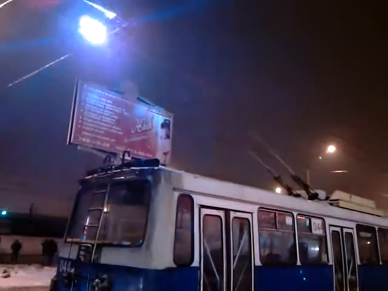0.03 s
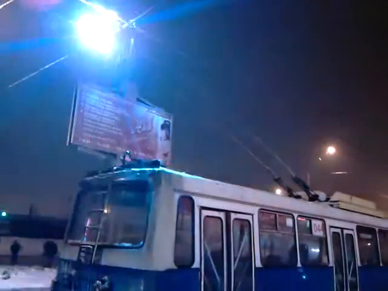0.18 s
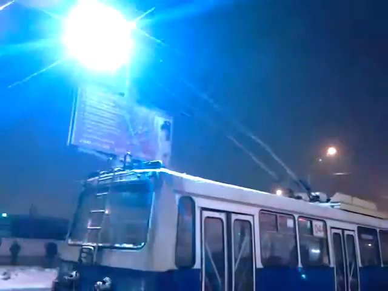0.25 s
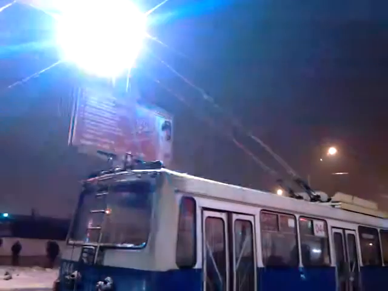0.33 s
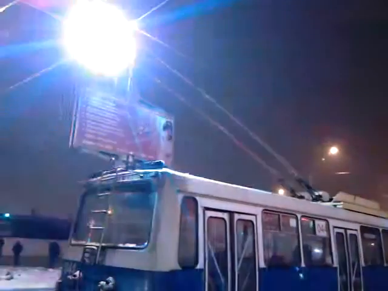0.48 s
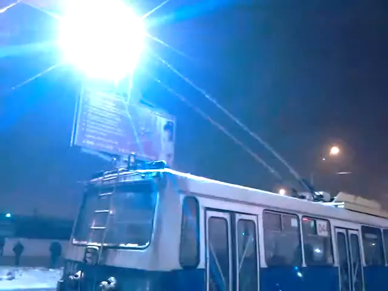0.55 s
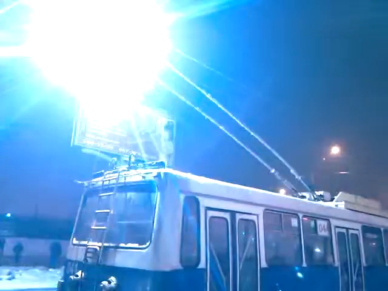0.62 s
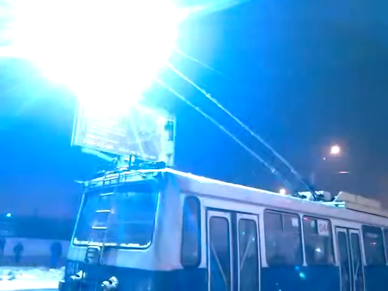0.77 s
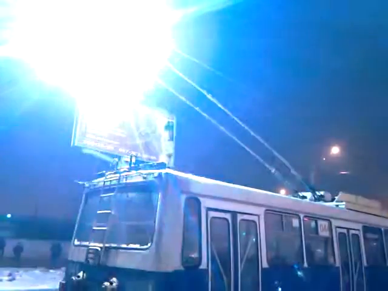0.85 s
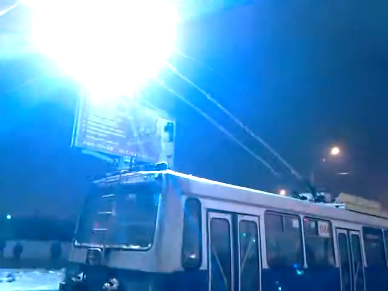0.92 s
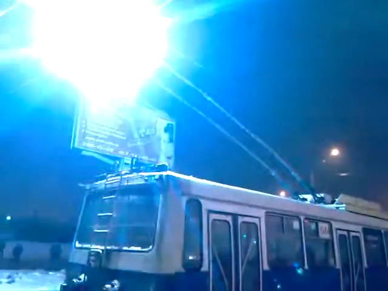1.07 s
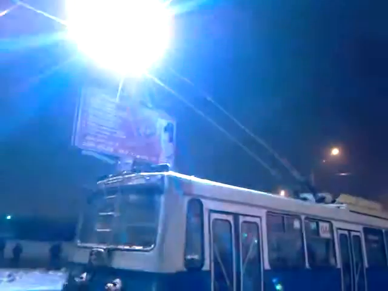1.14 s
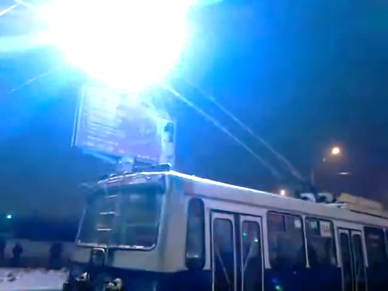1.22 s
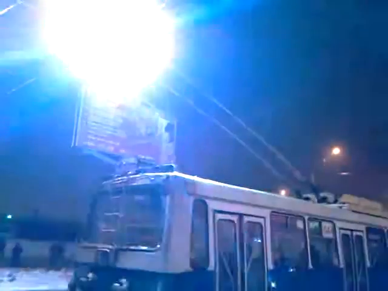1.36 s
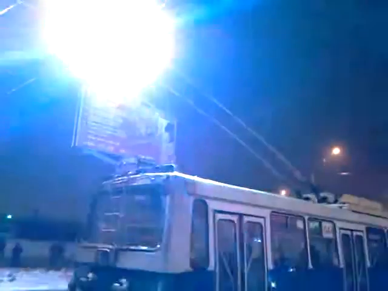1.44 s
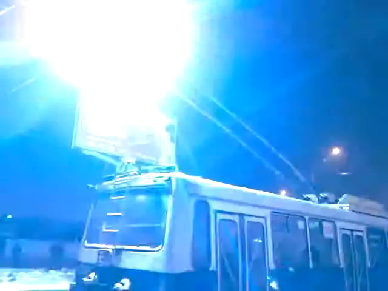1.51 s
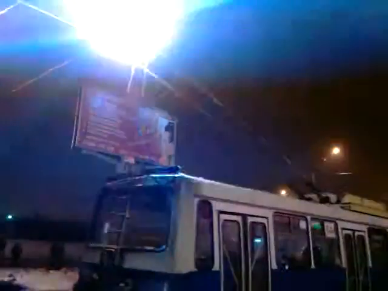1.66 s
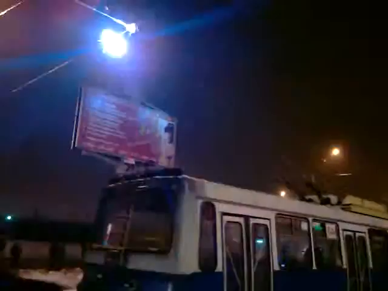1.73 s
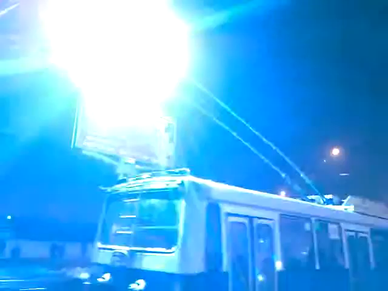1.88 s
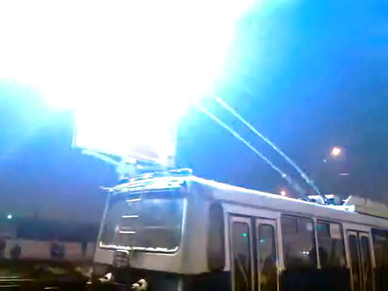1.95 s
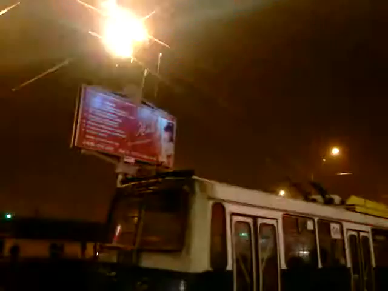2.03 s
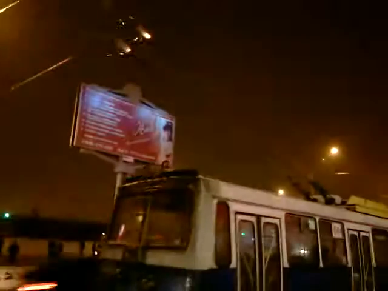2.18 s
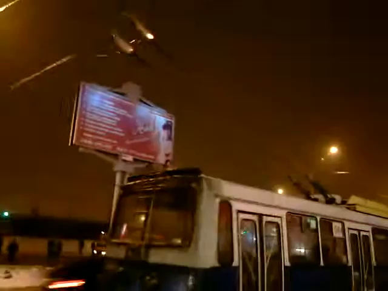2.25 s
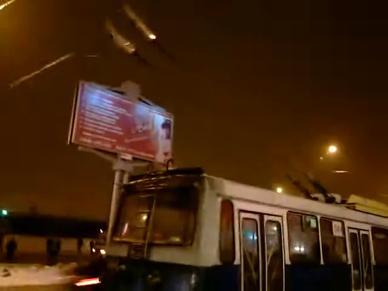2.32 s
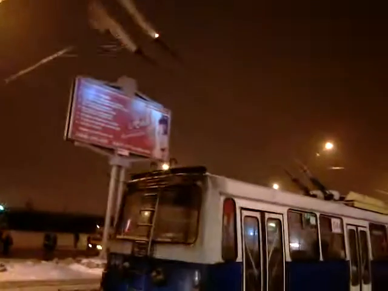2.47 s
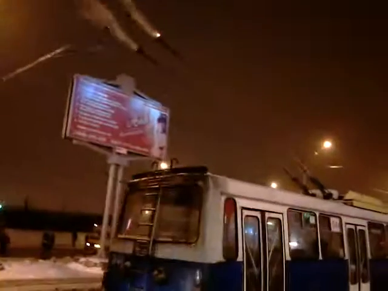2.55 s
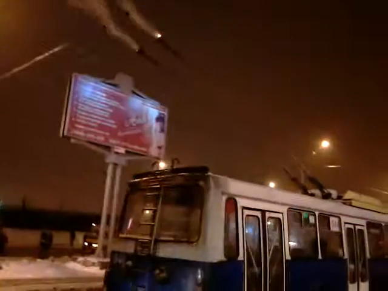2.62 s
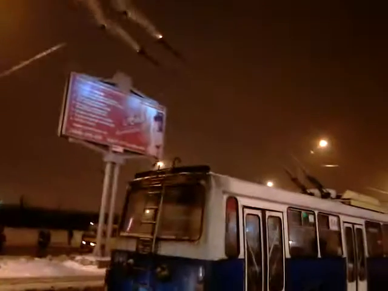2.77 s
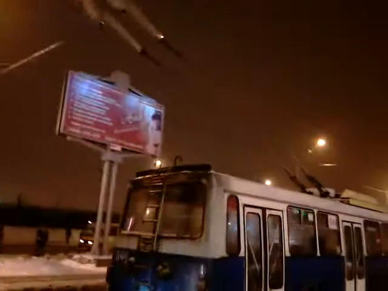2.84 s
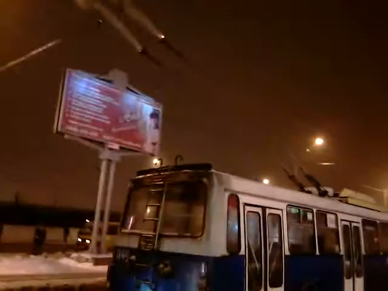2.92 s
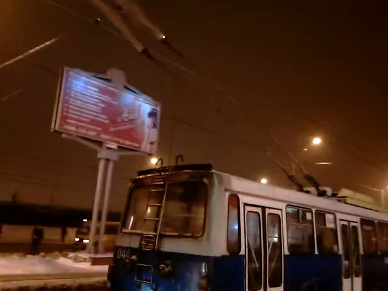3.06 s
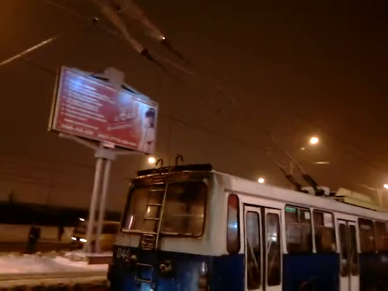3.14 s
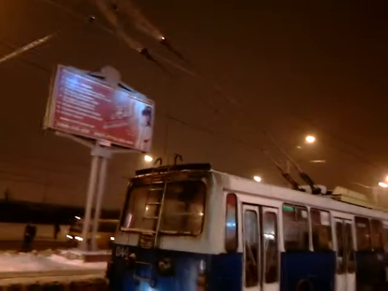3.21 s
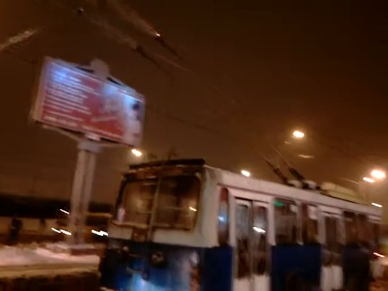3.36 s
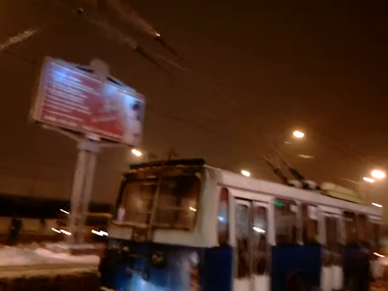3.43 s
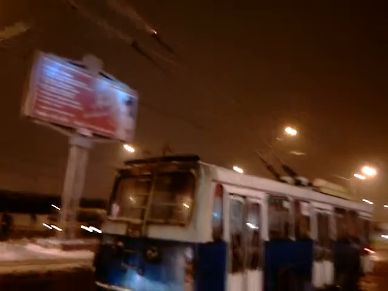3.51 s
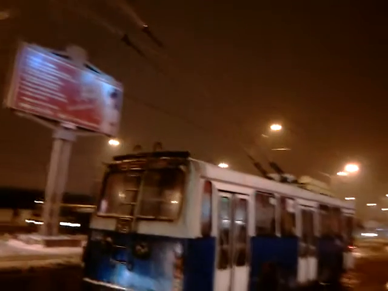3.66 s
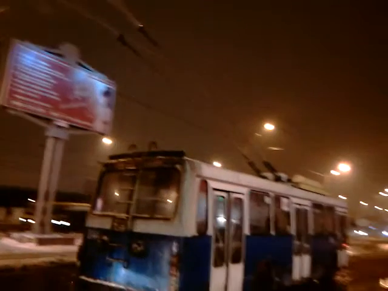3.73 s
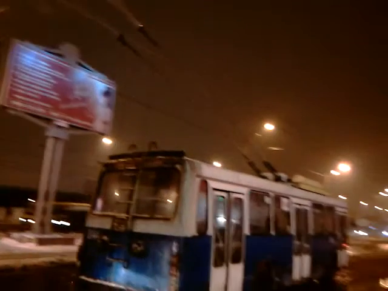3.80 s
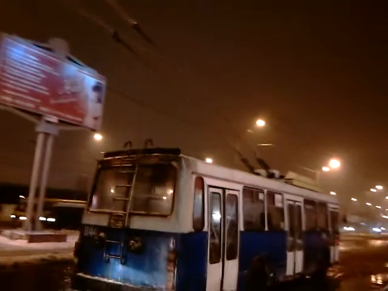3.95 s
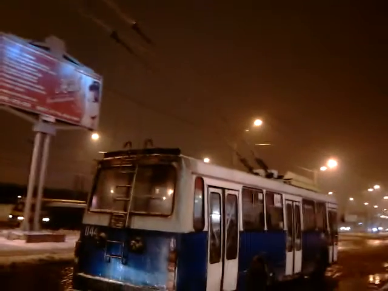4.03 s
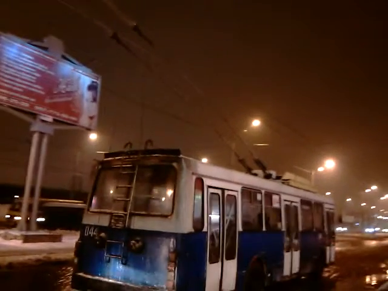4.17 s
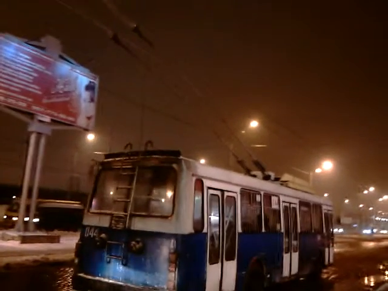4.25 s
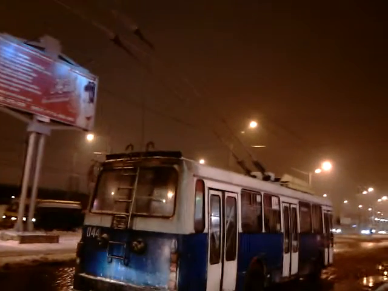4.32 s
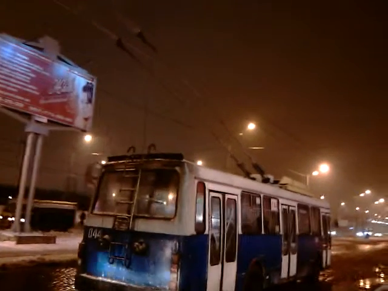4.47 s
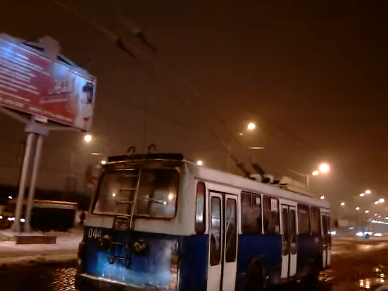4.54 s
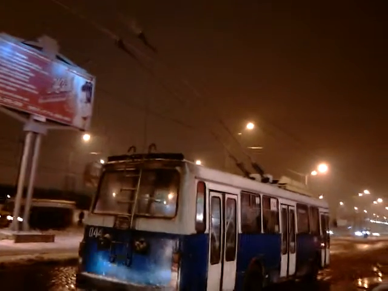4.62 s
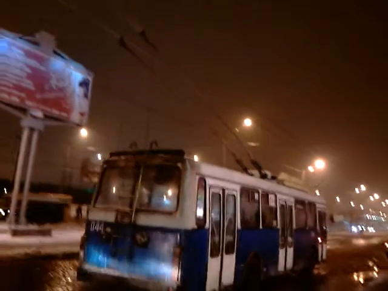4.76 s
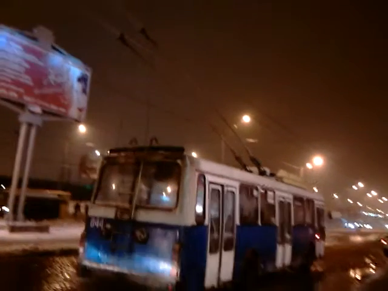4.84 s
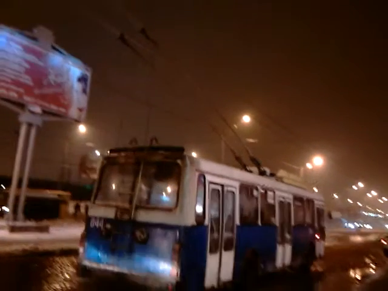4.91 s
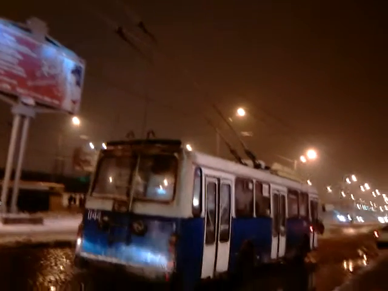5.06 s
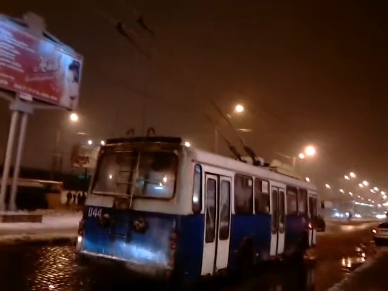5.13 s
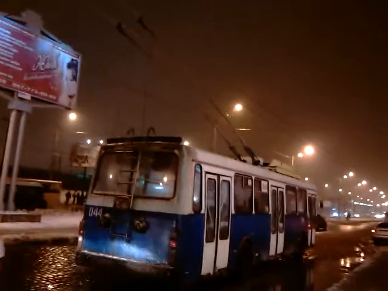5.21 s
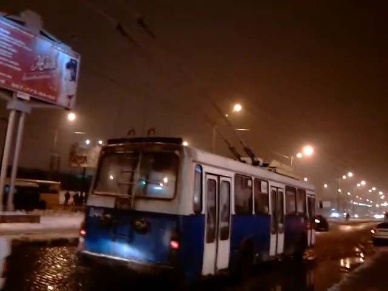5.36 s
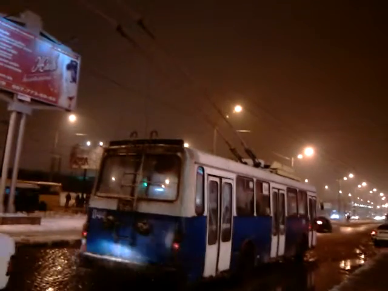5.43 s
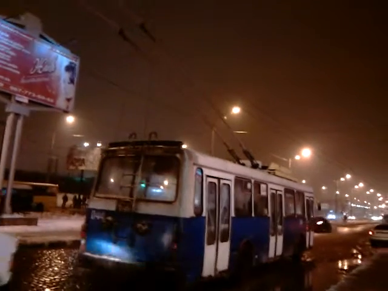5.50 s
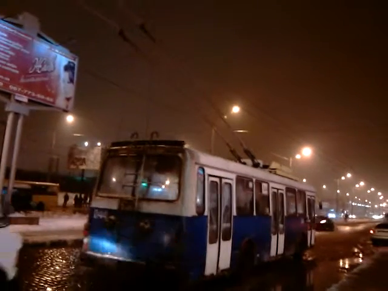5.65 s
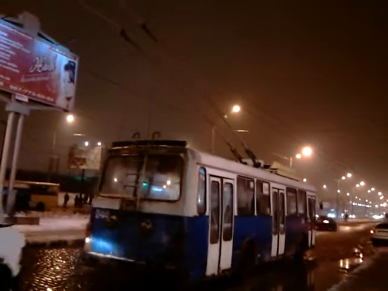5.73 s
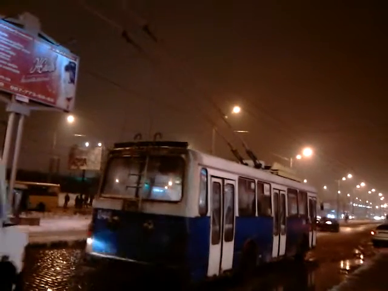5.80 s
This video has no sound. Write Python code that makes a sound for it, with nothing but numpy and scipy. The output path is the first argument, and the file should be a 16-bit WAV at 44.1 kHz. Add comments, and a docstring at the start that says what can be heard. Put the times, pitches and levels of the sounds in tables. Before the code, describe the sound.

Violent spitting electrical sparks on a wet winter street cut off abruptly, followed by a hard clack, revving diesel, tyre hiss and gusts.

```python
"""An electric arc spits and flares at a trolleybus pole under an iced wire and goes out after two seconds.
It is a train of pressure spikes, filtered into snap and roar, with a ground reflection and a street echo.
A traction motor and a distant car hum as gliding sines; a diesel sums exhaust harmonics and pulsed clatter.
Filtered noise makes wet tyres, spray, squeaks, a slam and its rebound, and gusts on the microphone;
that small microphone passes a narrow speech band and overloads on the highest peaks."""
import sys
import numpy as np
from scipy import signal
from scipy.fft import rfft, irfft, next_fast_len
from scipy.io import wavfile
from scipy.ndimage import uniform_filter1d, map_coordinates

SR = 44100
rng = np.random.default_rng(int(sys.argv[2]) if len(sys.argv) > 2 else 0)


def wav_record(signal):
    """Record a signal, one row per channel, as 16-bit PCM in the file named by sys.argv[1]."""
    frames = np.transpose(np.atleast_2d(signal))
    bounded = np.clip(frames, -1, 1)
    # unit amplitude maps onto the largest positive 16-bit level
    quanta = np.round(bounded * 32767).astype(np.int16)
    wavfile.write(sys.argv[1], SR, quanta)


N = 259484


def amp(db):
    """Decibel law: amplitude ratio of a level."""
    return 10 ** (np.asarray(db) / 20)


def unit(x):
    """Power normalisation: scale to rms 1."""
    return x / np.sqrt(np.mean(x ** 2) + 1e-20)


def clock():
    """Uniform sampling: the time of each sample in seconds."""
    return np.arange(N) / SR


def along(points, hz):
    """Logarithmic frequency scale: interpolate (f/Hz, value) points along it."""
    f, v = np.transpose(points)
    return np.interp(np.log(hz + 1), np.log(f + 1), v)


def curves(rows):
    """Linear interpolation: one value per sample for each column after the time."""
    s, *cols = np.transpose(rows)
    return [np.interp(clock(), s, c) for c in cols]


def wobble(rate):
    """Band-limited fluctuation: a smooth random curve with rate knots a second."""
    knots = rng.standard_normal(int(N * rate / SR) + 4)
    return map_coordinates(knots, [clock() * rate])


def filtered(x, response):
    """Linear filtering: multiply the spectrum by a response of frequency."""
    size = next_fast_len(N + SR // 2)
    return irfft(rfft(x, size) * response(np.fft.rfftfreq(size, 1 / SR)), size)[:N]


def noise(spectrum):
    """Spectral shaping: Gaussian noise of rms 1 with the given colour."""
    return unit(filtered(rng.standard_normal(N), lambda hz: amp(along(spectrum, hz))))


def narrow(centre_hz, width_hz):
    """Resonance: noise of rms 1 in one peak, width_hz wide at half amplitude."""
    white = rng.standard_normal(N)
    return unit(filtered(white, lambda hz: 1 / (1 + (2 * (hz - centre_hz) / width_hz) ** 2)))


def voice_band(x, edge_hz=3690):
    """Band limitation: the microphone channel falls steeply above the speech band."""
    return filtered(x, lambda hz: 1 / np.sqrt(1 + (hz / edge_hz) ** 64))


def struck(pulses, colour, size=2048):
    """Minimum-phase impulse response: colour pulses causally, with unit gain in power in the speech band."""
    cepstrum = irfft(np.log(amp(along(colour, np.fft.rfftfreq(size, 1 / SR)))))
    # folding the cepstrum onto positive times makes the filter causal
    cepstrum[1:size // 2] *= 2
    cepstrum[size // 2 + 1:] = 0
    shape = irfft(np.exp(rfft(cepstrum)))
    audible = voice_band(np.pad(shape, (size, 0)))
    return signal.fftconvolve(pulses, shape / np.linalg.norm(audible))[:N]


def burst(start, length, rise_s, fall_s):
    """Exponential relaxation: an envelope that rises, holds for its length and falls."""
    age = np.maximum(clock() - start, 0)
    fall = np.exp(-np.minimum(np.maximum(age - length, 0) / fall_s, 60))
    return (1 - np.exp(-age / rise_s)) * fall


def hum(hz, db, waver_db):
    """Phase integration: one gliding low tone."""
    tone = np.sqrt(2) * np.sin(2 * np.pi * np.cumsum(hz) / SR)
    return amp(db + waver_db * wobble(4.7)) * tone


def street_echo(x, build_s=0.0098):
    """Diffuse reverberation: a tail off the house fronts, each frequency dying at its own speed."""
    # decay of the street: f/Hz, t60/s
    houses = [(150, 0.74), (1000, 0.88), (3500, 0.74)]
    hz, t, z = signal.stft(rng.standard_normal(SR), SR, nperseg=256)
    decay = amp(-60 * t / along(houses, hz)[:, None])
    tail = signal.istft(z * decay * (1 - np.exp(-t / build_s)), SR, nperseg=256)[1]
    return signal.fftconvolve(x, tail / np.linalg.norm(tail))[:N]


def traffic(near_db=-25, swell_db=1.5):
    """Broadband rolling noise: wet tyres hiss above a rumble, and narrow tones rise with nearness."""
    # hiss of the wet street: t/s, level/dB
    street = [(0, -32.5), (1.7, -26.5), (2.4, -30.5), (3.3, -32.5), (3.65, -24), (4.9, -25.5), (5.35, -28),
              (5.88, -28.5)]
    # relative spectrum of the tyre hiss: f/Hz, level/dB
    tyres = [(260, -34.5), (450, -11), (544, -14), (767, -5), (878, -7.5), (1110, -3), (1200, -10.5),
             (1340, -6), (1610, -7.5), (1780, -8), (3280, -13), (3660, -16.5), (3900, -14.5), (5070, -60.5),
             (8580, -120)]
    # relative spectrum of the rumble: f/Hz, level/dB
    rumble_colour = [(15, -14.5), (35, -1), (90, 3.5), (160, 1.5), (280, 0), (450, -5.5), (650, -12),
                     (1200, -25.5)]
    # tones of passing traffic when the hiss is at near_db: f/Hz, width/Hz, level/dB
    whine = [(1220, 76, -37), (1330, 63, -35.5), (3398, 200, -43)]
    rumble_db, rumble_follows = -28.5, 0.44  # level at near_db; share of the hiss swings it follows
    hiss_db, = curves(street)
    nearness = amp(hiss_db - near_db)
    tones = sum(amp(db + swell_db * np.tanh(wobble(3.7))) * narrow(hz, width) for hz, width, db in whine)
    hiss = amp(hiss_db + 1.1 * wobble(18)) * noise(tyres)
    rumble = amp(rumble_db + 1.9 * wobble(8.2)) * noise(rumble_colour)
    return nearness ** rumble_follows * rumble + hiss + nearness ** 2 * tones


def distant_car():
    """Periodic radiation: a car further off is heard as one gliding, wavering hum."""
    # hum of the car: t/s, f/Hz, level/dB
    car = [(1.9, 48, -46.5), (2.35, 56.64, -33.5), (3.0, 52.7, -36), (3.6, 47.1, -53)]
    hz, db = curves(car)
    return hum(hz, db, waver_db=1.3)


def spray(width_hz=650):
    """Spreading and frequency shift: a passing car's band of hiss swells, fades and sinks in pitch."""
    peak_db, peak_s, approach_s = -28, 5.15, 1.34  # loudest moment and time scale of the swell
    from_hz, to_hz, turn_s, glide_s = 2130, 1352, 4.95, .3
    t = clock()
    hz = from_hz + (to_hz - from_hz) * (1 + np.tanh((t - turn_s) / glide_s)) / 2
    nearness = 1 / (1 + ((t - peak_s) / approach_s) ** 2) ** 2
    drift = np.exp(2j * np.pi * np.cumsum(hz - hz.mean()) / SR)
    band = (signal.hilbert(narrow(hz.mean(), width_hz)) * drift).real
    return nearness * amp(peak_db + wobble(15)) * band


def wind(lumpy_db=6.5):
    """Turbulent pressure: lumpy gusts on the microphone, the strongest eddies single push-pull swings."""
    # gusts: t/s, length/s, level/dB
    gusts = [(0, 0.04, -15.5), (0.101, 0.11, -17.5), (0.513, 0.13, -20.5), (1.714, 0.079, -21.5),
             (2.438, 0.2, -31), (3.592, 0.43, -18), (4.076, 0.075, -23.5), (4.25, .5, -30.5),
             (5.434, 0.043, -17.5), (5.606, 0.081, -23.5), (5.753, 0.1, -23.5)]
    # relative spectrum of the buffeting: f/Hz, level/dB
    buffet = [(18, -45.5), (30, -7), (113, -3), (233, -1.5), (268, 0.5), (332, -2.5), (411, -6), (649, -11),
              (900, -17.5), (1170, -52), (1980, -120)]
    # single eddies that hit the microphone: t/s, peak level/dB, f/Hz
    puffs = [(.124, -9, 335), (.141, -4, 380), (0.534, -5, 250), (0.551, -2.5, 306), (1.797, -9, 398),
             (3.615, -6.5, 293.5), (3.697, 7, 269), (3.771, 0, 330), (3.79, 0, 204), (3.85, 1.5, 307),
             (3.891, -8, 400), (3.947, -1, 396), (3.957, 5, 254), (4.15, -10, 400), (5.446, -11, 220)]
    rise_s, fall_s, breeze_db = 0.016, 0.039, -48.5
    t = clock()
    force = amp(breeze_db) + sum(amp(db) * burst(s, length, rise_s, fall_s) for s, length, db in gusts)
    out = force * unit(amp(lumpy_db * np.tanh(wobble(160))) * noise(buffet))
    for s, db, hz in puffs:
        u = 2 * np.pi * hz * (t - s)
        out -= amp(db) * u * np.exp((1 - u * u) / 2)
    return out


def diesel(knock_decay=0.37, uneven_db=-2.5, load_db=11):
    """Harmonic series and pulsed noise: each firing puffs the exhaust and rattles the block."""
    # speed of the engine: t/s, firing rate/Hz
    engine = [(0, 26.3), (1.0, 29), (2.0, 27.7), (3.22, 27.8), (3.5, 33.5), (3.8, 40.5), (4.5, 39),
              (4.95, 40.8), (5.3, 39.7), (5.6, 32.5)]
    # relative exhaust harmonics: multiple of the firing rate, level/dB
    harmonics = [(1, -0.5), (1.5, -17.5), (2, -11), (3, -7), (4, -6), (5.5, -8), (7, -15.5)]
    block_colour = [(200, -18.0), (600, -10.0), (1150, 5), (1800, 0.5), (2500, -7), (3500, -11)]  # f/Hz, dB
    exhaust_db, idle_clatter_db, revved_clatter_db = -34, -40.5, -23.5
    idle_rate, revved_rate = 26, 33.25  # firings a second between which the clatter comes up
    rate, = curves(engine)
    clatter_db = np.interp(rate, [idle_rate, revved_rate], [idle_clatter_db, revved_clatter_db])
    firings = np.cumsum(rate) / SR
    phase = 2 * np.pi * firings
    load = amp(load_db * (rate - rate.max()) / np.ptp(rate))  # speed brings out the overtones
    exhaust = np.zeros(N)
    for k, db in harmonics:
        level = amp(db + 2.8 * wobble(6)) * (load if k > 1 else 1)
        exhaust += level * np.sin(k * phase + .5 * wobble(7.8))
    age = firings % 1  # share of a cycle since the last firing
    knock = np.exp(-age / knock_decay) * (1 - np.exp(-age / 0.15))
    beats = knock * amp(uneven_db * np.cos(phase / 4))  # four unlike cylinders
    clatter = unit(beats * noise(block_colour))
    return amp(exhaust_db) * np.sqrt(2) * exhaust + amp(clatter_db) * clatter


def motor():
    """Exponential approach to a top speed: the traction motor spins up and hums while it pulls."""
    start_hz, top_hz, spin_up_s = 154.5, 172.5, .72
    pull_db, on_s, off_s, fade_db_per_s = -34.5, .35, 1.05, 52
    t = clock()
    hz = top_hz + (start_hz - top_hz) * np.exp(-t / spin_up_s)
    outside_s = np.abs(t - np.clip(t, on_s, off_s))  # time away from the steady pull
    return hum(hz, pull_db - fade_db_per_s * outside_s, waver_db=0.0)


def slam(clack_t60=0.12, attack=0.0029, lumpy_db=-1.0):
    """Impact and damped modes: two blows on a vehicle body clack, then its panels boom and rattle."""
    # a slam and its rebound: t/s, clack level/dB, boom level/dB, boom t60/s
    blows = [(2.914, -9.5, -15.5, 0.14), (2.951, -13, -16.5, 0.35)]
    # relative spectrum of the hard clack: f/Hz, level/dB
    clack_colour = [(290, -27.5), (500, -7), (736, -16), (1100, -4.5), (1240, -8), (2010, -19), (2170, -19),
                    (3230, -17), (3490, -15), (3900, -20.5), (5070, -50.5), (8580, -120)]
    # relative spectrum of the panel boom: f/Hz, level/dB
    boom_colour = [(12, -31), (20, 1), (40, -10.5), (166, -13.5), (218, -8), (484, -15), (549, -14),
                   (743, -16.5), (858, -47.5), (900, -22), (1170, -48.5), (1980, -120)]
    clack, out = noise(clack_colour), np.zeros(N)
    boom = unit(noise(boom_colour) * amp(lumpy_db * wobble(90)))
    for s, clack_db, boom_db, t60 in blows:
        age = np.maximum(clock() - s, 0)
        hard = amp(clack_db - 60 * age / clack_t60) * clack
        deep = amp(boom_db - 60 * age / t60) * boom
        out += (1 - np.exp(-age / attack)) * (hard + deep)
    # a low panel mode rings on after the rebound
    age = np.maximum(clock() - blows[-1][0], 0)
    out += amp(-20.5 - 60 * age / 0.28) * (1 - np.exp(-age / attack)) * narrow(255, 50)
    return out + amp(-7.0) * street_echo(out)


def squeaks(width_hz=290, steadiness=0.64):
    """Noise-driven resonance: each squeak or zip is one shrill, wavering peak over a broad scrape."""
    # squeaks: t/s, Gaussian half length/s, tone level/dB, f/Hz, scrape relative to the tone/dB
    squeak_rows = [(0.134, 0.0062, -19.5, 3570, -9), (0.185, 0.0069, -14, 3520, -23),
                   (0.207, 0.036, -28, 3770, -29), (0.267, 0.0048, -26.5, 3580, -20),
                   (0.345, 0.0087, -16, 2510, -2.5), (0.68, 0.0046, -11, 3305, -7.5),
                   (1.507, 0.0049, -8, 3390, -12), (5.501, .001, -16.5, 3312, 4),
                   (5.503, 0.015, -27, 3413, 1), (5.523, 0.0076, -17, 3390, -28),
                   (5.566, .055, -31, 3470, -7)]
    scrape = unit(voice_band(noise([(500, -9.0), (1500, -3), (3500, -3.5)])))  # f/Hz, dB
    out = np.zeros(N)
    for s, half, db, hz, scrape_db in squeak_rows:
        tone = narrow(hz, width_hz)
        swing = np.sqrt(np.abs(uniform_filter1d(tone ** 2, size=40)) + 1e-6)
        steadied = unit(tone / swing ** steadiness)
        envelope = np.exp(-((clock() - s) / half) ** 2 / 2)
        out += amp(db) * envelope * (steadied + amp(scrape_db) * scrape)
    return out


def sparks(rate, scatter, spread_db):
    """Random point process: irregular spikes of one sign and mean power 1, rate a second."""
    count = np.cumsum(rate) / SR
    chance = rng.standard_normal((8000, 2))[:int(count[-1])]
    due = np.arange(len(chance)) + scatter * chance[:, 0]
    at = np.searchsorted(count, due).clip(0, N - 1)
    size = unit(amp(spread_db * np.tanh(chance[:, 1])))
    return -np.bincount(at, size * np.sqrt(SR / rate[at]), N)


def ground_echo(x, delay=.0066, gain=0.75, wander=0.00031):
    """Specular reflection: the road returns every spark after a delay that shifts as the flame dances."""
    late = np.arange(N) - SR * (delay + wander * wobble(7))
    return (x + gain * map_coordinates(x, [late], order=1)) / np.hypot(1, gain)


def arc_strength(sputter_flame_db=-6, ignite_s=.002):
    """Ignition, stretching and quenching: strength of sparks and flame, flares over a growing sputter."""
    # flares, before sag and strike: t/s, length/s, relative level/dB, flame roar relative to the snap/dB
    flares = [(0.314, 0.044, -20.5, -4.5), (0.386, 0.028, -28, 4.5), (0.478, .1, -24, 0.5),
              (0.647, .135, -16.5, -1.5), (0.84, 0.013, -23, -7), (0.892, .016, -21.5, -3.5),
              (0.924, 0.036, -21.5, -11), (0.958, .205, -15, 0), (1.203, .011, -18, 4),
              (1.243, 0.073, -19.5, 5.5), (1.357, 0.017, -20, -9), (1.402, 0.039, -21, -4),
              (1.463, 0.049, -13, 0.5), (1.52, .04, -17.5, -1.5), (1.565, .058, -13, 4),
              (1.656, .024, -21, 6.5), (1.729, .028, -19.5, -5), (1.896, .05, -9, 2),
              (1.967, .04, -13.5, 1.5)]
    strike_db, strike_s = 2.5, .015  # a flare strikes with extra snap, which fades this fast
    sag_db_per_s = 22  # it weakens as the arc stretches
    flame_grows_s, quench_s = 0.0057, .004  # the flame builds up, and dies when the arc breaks
    # faint sputter builds up as the pole drags through the ice
    start_db, grows_db_per_s, top_db = -38, 9, -28.5
    out_s, fade_db_per_s = 2.08, 230  # the pole finds clean wire
    t = clock()
    sputter_db = np.minimum(start_db + grows_db_per_s * t, top_db)
    strength = amp(sputter_db - fade_db_per_s * np.clip(t - out_s, 0, 1))
    flame = strength * amp(sputter_flame_db)
    for start, length, db, roar_db in flares:
        age = np.clip(t - start, 0, length)
        level_db = db - sag_db_per_s * age
        snap = amp(level_db + strike_db * np.exp(-age / strike_s)) * burst(start, length, ignite_s, quench_s)
        strength = np.maximum(strength, snap)
        roar = amp(level_db + roar_db) * burst(start, length, flame_grows_s, quench_s)
        flame = np.maximum(flame, roar)
    return strength, flame


def arc(sparse_rate=150, dense_rate=600, snap_db=1.0, roar_db=-1, single_db=6, wet_db=-14.0, flicker_db=3.0):
    """Impulsive discharge: a stronger arc sparks faster, and a long flame adds a lower roar to each spark."""
    # single loud sparks, before single_db and the filters: t/s, relative level/dB
    snaps = [(0.65, -5.5), (0.68, 0.5), (1.0276, 2), (1.068, 1), (1.157, -7.5), (1.2042, 1), (1.21, -5),
             (1.371, -3), (1.538, 0.5), (1.674, 3.5), (1.736, 1.5), (1.748, 4), (1.797, -1), (1.818, -3),
             (1.8386, -1.5), (1.858, -3), (1.8987, -3.5), (1.987, -4)]
    # relative spectrum of the snap: f/Hz, level/dB
    snap_colour = [(100, -23), (600, -16), (1300, -2), (2150, 1.5), (2550, 6), (2850, 0.5), (3300, 7.5),
                   (3700, 0.5)]
    # relative spectrum of the flame's roar: f/Hz, level/dB
    roar_colour = [(100, -33.5), (480, -5.5), (770, 3), (1000, -2), (1300, 2), (1550, -7), (1820, -1),
                   (2150, -4.5), (3500, -20.5)]
    strength, flame = arc_strength()
    rate = sparse_rate + dense_rate * np.minimum((strength / amp(-16)) ** 1.4, 3)
    train = sparks(rate, scatter=.45, spread_db=2.0)
    train *= unit(amp(flicker_db * np.tanh(wobble(90))))  # the current comes in spurts
    singles = np.zeros(N)
    for s, db in snaps:
        singles[round(s * SR)] = -amp(db + single_db)
    crackle = amp(snap_db) * struck(train * strength + singles, snap_colour)
    roar = amp(roar_db) * struck(train * flame + singles / 2, roar_colour)
    direct = ground_echo(crackle + roar)
    return direct + amp(wet_db) * street_echo(direct)


def scene():
    """Superposition: the arc and the street around it, all in one channel."""
    vehicles = motor() + distant_car() + diesel() + traffic() + spray()
    return (arc() + vehicles + wind() + slam() + squeaks())[None]


def record(dry, ceiling=.72, hardness=14, top_hz=15870):
    """Band limitation and saturation: a narrow speech band, then overload on the highest peaks."""
    x = voice_band(dry[0])
    x = x / (1 + np.abs(x / ceiling) ** hardness) ** (1 / hardness)
    return filtered(x, lambda hz: hz < top_hz)[None]


dry = scene()
out = record(dry)
wav_record(out)
```